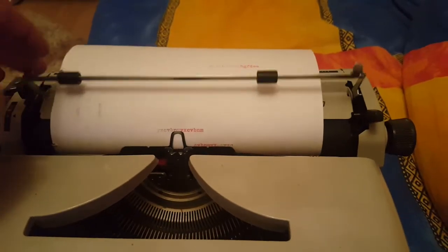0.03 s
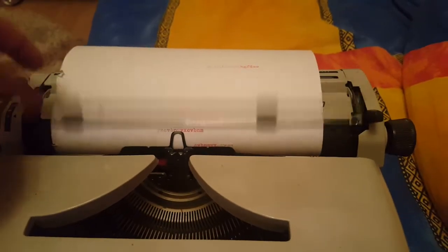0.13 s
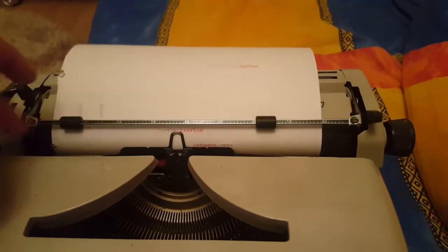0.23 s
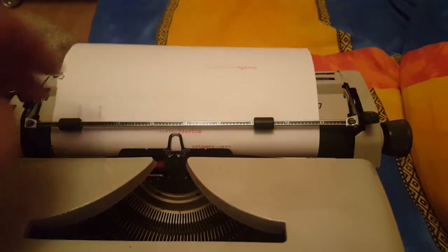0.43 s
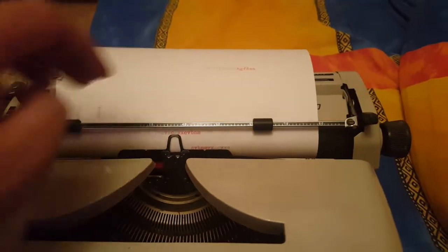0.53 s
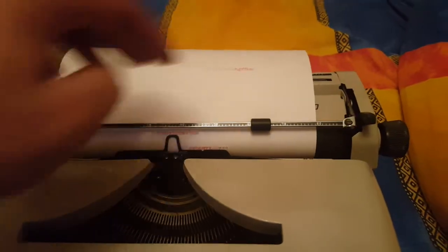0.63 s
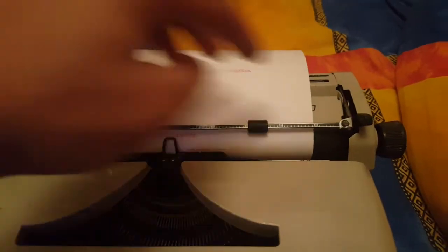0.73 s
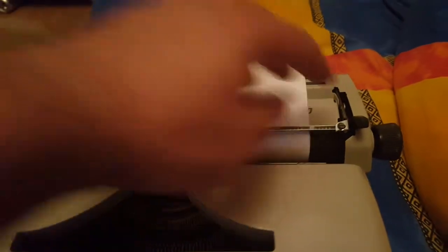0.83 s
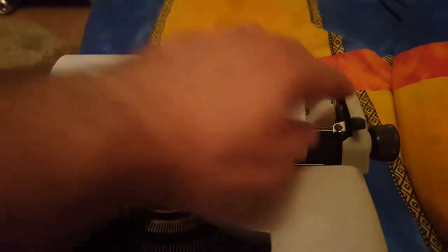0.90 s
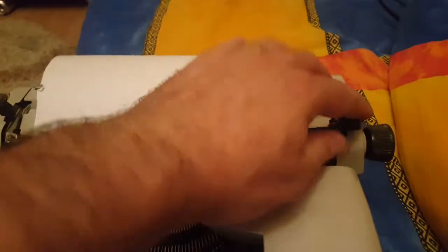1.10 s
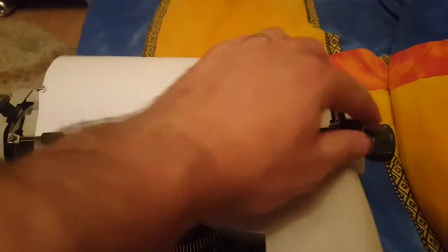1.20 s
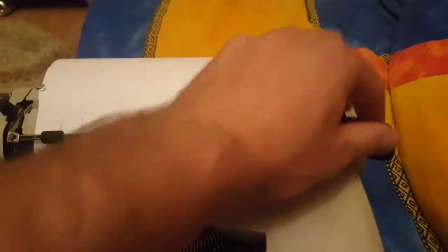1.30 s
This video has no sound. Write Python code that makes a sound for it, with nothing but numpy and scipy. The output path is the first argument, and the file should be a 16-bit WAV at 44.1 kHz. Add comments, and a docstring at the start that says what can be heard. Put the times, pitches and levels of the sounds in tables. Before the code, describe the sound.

Close by in a small room, a typewriter's metal paper bar clacks down, settling with a clink and a short ring. After a pause, the carriage clicks quietly and fingertips tap and brush the knob.

```python
"""A manual typewriter, close by in a small room. A finger touches the lever of the sprung paper bail;
the hinge scrapes as it tips over. At 0.2 s the bail clacks onto the platen, chatters and settles
with a clink, while the frame, a spring and the table ring on. At 1 s a hand takes hold of the platen
knob: the carriage clicks in its play, then fingertips tap and brush the knob.
Faint room noise and mains hum lie under it all."""
import sys
import numpy as np
from scipy import signal
from scipy.fft import rfft, irfft
from scipy.io import wavfile
from scipy.ndimage import uniform_filter1d

SR = 44100
rng = np.random.default_rng(int(sys.argv[2]) if len(sys.argv) > 2 else 0)


def log_audio(samples):
    """Write samples as a 16-bit WAV file to the path given in sys.argv[1]."""
    # one column per channel
    frames = np.atleast_2d(samples).T
    # limit to full scale, then quantise
    limited = np.clip(frames, -1, 1)
    pcm = np.round(limited * 32767).astype(np.int16)
    wavfile.write(sys.argv[1], SR, pcm)


N = 59535
FFT_SIZE = 81920
HZ, T = np.fft.rfftfreq(FFT_SIZE, 1 / SR), np.arange(N) / SR


# Each row: start in seconds, level in dB, crack over clatter in dB, tilt in dB per octave.
BAIL_HITS = [(.1993, -25, -3, -0.5), (.2037, -21, -4.5, 1), (.2053, -18, 6, 3), (.2073, -24, 8, -3.5),
             (.217, -20, 0, -2.5), (.227, -24, 1.5, 1.5), (.235, -24.5, -6, 0)]
# Each row: frequency in Hz, gain in dB.
BAIL_EQ = [(100, -23), (200, -9.5), (340, -20.5), (450, -7.5), (570, 1), (740, 0), (950, -8.5),
           (1350, -1.5), (1660, -4), (1950, 0.5), (2450, -2.5), (3050, -1), (3900, -2), (5300, -6.5),
           (6800, -14), (8100, -17.5), (10100, -27), (13000, -19.5), (15800, -24)]
# Each row: frequency in Hz, level in dB, unscaled T60 in seconds.
FRAME_MODES = [(665, -4, 0.28), (711, -3, 0.082), (800.4, -3.5, 0.1), (1272, 1, .15), (1383, 3, 0.25),
               (1920, 2.5, .18), (2083, -2.5, 0.18), (3000, 2.5, .16), (3160, -2, .16), (3910, -4, .15),
               (3950, 1, 0.32), (4660, -3, .15), (8340, -9, 0.15)]
# Each row: frequency in Hz, clatter T60 in seconds.
BAIL_DECAY = [(600, 0.11), (1300, 0.16), (4000, .125), (8000, 0.13), (13000, 0.13)]

def bail_clack():
    """The bail hits the platen and chatters, ringing the frame."""
    return strikes(BAIL_HITS, BAIL_EQ, FRAME_MODES, BAIL_DECAY, modes_db=-18, t60_scale=0.76,
                   crack_s=0.0021, grit_db=5, grit_t60_s=0.0023, pivot_hz=2500)


# Each row: start in seconds, level in dB, crack over clatter in dB, tilt in dB per octave.
CLINK_HITS = [(.2972, -32, -6, 0), (.3012, -34, -8, 0)]
# Each row: frequency in Hz, gain in dB.
CLINK_EQ = [(300, -3), (1000, -7.5), (2500, -4.5), (4300, 0), (6000, -22), (8200, -8.5), (10000, -25.5),
            (15800, -18)]
# Each row: frequency in Hz, level in dB, unscaled T60 in seconds.
CLINK_RING = [(3970, 6.5, 0.041), (4170, 2.5, 0.026), (4830, 10.5, 0.025), (5000, -13, 0.035),
              (6140, -5, 0.045)]
# Each row: frequency in Hz, clatter T60 in seconds.
CLINK_DECAY = [(1000, 0.049), (4500, 0.018), (13000, 0.024)]

def bail_clink():
    """The bail settles with two small, bright contacts."""
    return strikes(CLINK_HITS, CLINK_EQ, CLINK_RING, CLINK_DECAY, modes_db=-4.5, t60_scale=0.38,
                   crack_s=0.00096, grit_db=17, grit_t60_s=0.0027, pivot_hz=4000)


# Each row: start in seconds, level in dB, crack over clatter in dB, tilt in dB per octave.
HINGE_HITS = [(.169, -56, -10.5, 0.5), (.1737, -48, -3.5, 4), (.182, -36, -6.5, -3.5)]
# Each row: frequency in Hz, gain in dB.
HINGE_EQ = [(300, -36), (800, -20), (1060, 1.5), (1400, -11.5), (1800, -2.5), (3000, -1.5), (4500, -5.5),
            (6500, -16.5), (8000, -18), (10000, -35.5), (15800, -32)]
# Each row: frequency in Hz, level in dB, unscaled T60 in seconds.
HINGE_RING = [(1047, -2.5, 0.73), (1830, -2, .15), (2820, -2, 0.049), (4900, -5, 0.21), (8470, -12.5, 0.27)]

def hinge_scrape():
    """The hinge scrapes in three ticks, each louder, as the bail tips over."""
    return strikes(HINGE_HITS, HINGE_EQ, HINGE_RING, CLICK_DECAY, modes_db=-10.5, t60_scale=0.67,
                   crack_s=0.0004, grit_db=3, grit_t60_s=0.0031, pivot_hz=2500)


# Each row: frequency in Hz, level in dB, rise in seconds, T60 in seconds, left over right in dB.
PANEL_MODES = [(101, -41, .02, .24, 0), (139, -56, .02, 1.4, 1), (176, -35, .015, .15, 1),
               (484, -45, .005, .33, 3), (575, -27, .003, .1, 3), (641, -43, .01, .42, 3),
               (969, -47, .005, .42, 4), (1451, -40, .01, .33, 4)]

def panels(start_s=0.206):
    """The case panels and the table ring on after the clack."""
    return placed(start_s, sum(tone(*mode) for mode in PANEL_MODES))


def spring(start_s=0.31):
    """A spring sings out as the bail comes to rest."""
    return placed(start_s, tone(hz=1593, db=-35.5, rise_s=0.054, t60_s=0.34, pan_db=7.5))


# Each row: start in seconds, level in dB, crack over clatter in dB, tilt in dB per octave.
CARRIAGE_HITS = [(.998, -57, -19, 3), (1.0052, -47, -22, 2), (1.0098, -40.5, 4.5, 1.5),
                 (1.0152, -44, 1, -4), (1.0277, -52, 3.5, -3.5), (1.039, -51, -6, 4), (1.06, -54.5, -10, 2)]
# Each row: frequency in Hz, gain in dB.
CARRIAGE_EQ = [(100, -14.5), (200, -28), (380, -13.5), (550, -13), (760, -6), (900, -15), (1120, -15),
               (1400, -6), (1650, -13), (1930, -5), (2900, -17.5), (3600, -10.5), (4400, -15),
               (7700, -26.5), (9600, -46), (15800, -39)]
# Each row: frequency in Hz, level in dB, unscaled T60 in seconds.
CARRIAGE_MODES = [(653, -5, 0.066), (750, 1, 0.06), (1123, -5.5, 0.06), (1335, -6.5, 0.11),
                  (1350, -11, 0.073), (1915, -11, 0.12), (2096, -3, 0.059), (3420, -14, 0.11)]
# Each row: frequency in Hz, clatter T60 in seconds.
CLICK_DECAY = [(400, 0.024), (1500, 0.08), (4000, 0.037), (8000, 0.045), (13000, 0.042)]

def carriage_clicks():
    """The carriage clicks in its play as a hand grips the knob."""
    return strikes(CARRIAGE_HITS, CARRIAGE_EQ, CARRIAGE_MODES, CLICK_DECAY, modes_db=-4, t60_scale=0.74,
                   crack_s=0.0012, grit_db=2, grit_t60_s=0.032, pivot_hz=2010)


# Each row: start in seconds, level in dB, rise in seconds, T60 in seconds.
TABLE_THUDS = [(.198, -50, .003, .12), (.226, -40, .008, .2), (.28, -52, .008, .15), (1.03, -60, .008, .16)]
# Each row: frequency in Hz, gain in dB.
THUD_EQ = [(20, -21.5), (55, -7), (78, -14.5), (105, -3), (180, -3.5), (260, -4), (400, -21), (900, -60.5)]

def table_thuds():
    """The machine rocks on its padded table."""
    return sum(placed(start_s, amp(db) * fade(t60_s, rise_s) * noise(amp(along(THUD_EQ, HZ)), LIKENESS))
               for start_s, db, rise_s, t60_s in TABLE_THUDS)


# Each row: start in seconds, level in dB, crack over clatter in dB, tilt in dB per octave.
FINGER_HITS = [(1.1225, -49.5, 1.5, 0.5), (1.147, -64, -7, 5), (1.194, -64.5, -9, 0),
               (1.2485, -63.5, -1, -1.5)]
# Each row: frequency in Hz, gain in dB.
FINGER_EQ = [(100, -4.5), (250, -10), (440, -2.5), (580, 1.5), (750, 2), (950, -9), (1200, -0.5),
             (1600, -7), (1930, -0.5), (2900, -10.5), (3900, -6), (5200, -14), (7500, -22), (9500, -36),
             (15800, -36)]

def finger_taps():
    """Fingertips land on the knob and faintly ring the carriage."""
    return strikes(FINGER_HITS, FINGER_EQ, CARRIAGE_MODES, CLICK_DECAY, modes_db=-16, t60_scale=0.57,
                   crack_s=0.0012, grit_db=15, grit_t60_s=0.027, pivot_hz=2000)


# Each row: centre in seconds, Gaussian half width in seconds, level in dB.
FINGER_SLIPS = [(1.122, 0.021, -59.5), (1.201, 0.0066, -65), (1.325, 0.043, -70)]

def finger_brushes(grain_db=3, grain_s=0.0025):
    """Skin slips on the knob in fine grains that sound through the carriage."""
    envelope = sum(amp(db) * np.exp(-((T - centre_s) / half_s) ** 2 / 2)
                   for centre_s, half_s, db in FINGER_SLIPS)
    grains = amp(grain_db * unit(uniform_filter1d(rng.standard_normal(N), int(grain_s * SR))))
    friction = noise(amp(along(FINGER_EQ, HZ)) * sides(along(MACHINE_PAN, HZ)), LIKENESS)
    return envelope * unit(grains * friction)


# Each row: start in seconds, level in dB, crack over clatter in dB, tilt in dB per octave.
LEVER_HITS = [(.082, -68, -8, 0)]
# Each row: frequency in Hz, gain in dB.
LEVER_EQ = [(500, -25), (1500, -12.5), (2050, 1), (2500, -13.5), (3070, -7), (5000, -21.5), (15800, -40.5)]
# Each row: frequency in Hz, level in dB, unscaled T60 in seconds.
LEVER_MODES = [(1940, 2.5, 0.05), (3100, -7.5, .05)]

def lever_touch():
    """A finger meets the bail lever with a faint tick."""
    return strikes(LEVER_HITS, LEVER_EQ, LEVER_MODES, CLINK_DECAY, modes_db=4, t60_scale=0.96,
                   crack_s=0.0012, grit_db=6, grit_t60_s=0.01, pivot_hz=2000)


# Each row: frequency in Hz, left over right in dB.
MACHINE_PAN = [(100, 1), (400, 4), (750, 2), (1300, 5), (1900, 5.5), (2900, -1.5), (4400, -8.5), (6200, 5),
               (8000, 11), (10000, 6), (14000, 3)]
# Each row: frequency in Hz, left-right correlation.
LIKENESS = [(100, 0.65), (500, 0.79), (1100, 0), (2000, .05), (5000, 0.12), (14000, 0.48)]

def strikes(hits, eq, modes, decay, modes_db, t60_scale, crack_s, grit_db, grit_t60_s, pivot_hz):
    """Each contact is a gritty crack, a dense clatter of small parts and a few clear modes."""
    out = np.zeros((2, N))
    body = amp(along(eq, HZ)) * sides(along(MACHINE_PAN, HZ))
    octaves = lambda hz: np.log2(np.maximum(hz / pivot_hz, 0.1))
    for start_s, db, crack_db, tilt_db in hits:
        gain = body * amp(tilt_db * octaves(HZ))
        clatter = dying(noise(gain, LIKENESS), decay)
        grit = unit(fade(grit_t60_s, 0.0001) * noise(1, LIKENESS)) / np.sqrt(N)
        impact = (T == 0) + amp(grit_db) * grit
        # Same energy as crack_s seconds at rms 1.
        crack = unit(filtered(impact, minimum_phase(gain))) * np.sqrt(crack_s * SR / N)
        ring = np.zeros((2, N))
        for hz, mode_db, t60_s in modes:
            phase, side, scatter_db = rng.standard_normal(3)
            phase_split = np.sign(side) * stereo_angle(LIKENESS, hz) * np.array([[1], [-1]])
            level = amp(mode_db + scatter_db + tilt_db * octaves(hz)) * sides(along(MACHINE_PAN, hz))
            wave = np.sin(2 * np.pi * (hz * T + phase) + phase_split)
            ring += level * fade(t60_s * t60_scale, 0.0004) * wave
        out += placed(start_s, amp(db) * (clatter + amp(crack_db) * crack + amp(modes_db) * ring))
    return out


# Each row: frequency in Hz, gain in dB.
ROOM_EQ = [(150, -1.5), (350, -0.5), (650, -3.5), (1100, -1.5), (2500, -2.5), (4200, -3.5), (7000, -1),
           (13000, 0)]
# Each row: frequency in Hz, T60 in seconds.
ROOM_DECAY = [(150, .45), (600, 0.35), (2000, 0.31), (4000, 0.24), (7800, 0.27), (13000, 0.13)]

def room(x, wet_db=-11, delay_s=0.008):
    """The short tail of a furnished room."""
    tail = placed(delay_s, dying(noise(amp(along(ROOM_EQ, HZ)), LIKENESS), ROOM_DECAY))
    return amp(wet_db) * filtered(x, rfft(tail / np.linalg.norm(tail[0]), FFT_SIZE))


# Each row: frequency in Hz, gain in dB.
AIR_EQ = [(20, -6.5), (45, -12.5), (75, -7), (110, -1), (160, -7), (300, -10), (500, -13), (700, -17.5),
          (1500, -19.5), (2500, -22.5), (5600, -30), (10000, -33.5), (15500, -28.5)]
# Each row: frequency in Hz, left-right correlation.
AIR_LIKENESS = [(100, .9), (600, 0.23), (3000, 0.18), (12000, 0.045)]

def air(noise_db=-68, hum_hz=100.74, hum_db=-74):
    """Quiet room noise with a faint mains hum."""
    hum = amp(hum_db) * np.sin(2 * np.pi * hum_hz * T)
    return amp(noise_db) * noise(amp(along(AIR_EQ, HZ)), AIR_LIKENESS) + hum


def amp(db):
    """Decibels to gain."""
    return 10 ** (np.asarray(db) / 20)


def unit(x):
    """x at rms 1."""
    return x / np.sqrt(np.mean(x ** 2) + 1e-20)


def along(points, hz):
    """(Hz, value) points read on a log frequency axis."""
    points_hz, values = np.transpose(points)
    return np.interp(np.log(hz + 1), np.log(points_hz + 1), values)


def sides(db):
    """Left and right gains for a level difference."""
    return amp(np.array([np.atleast_1d(db), -np.atleast_1d(db)]) / 2)


def stereo_angle(likeness, hz):
    """Mid-side angle in radians for a left-right correlation curve."""
    return np.arccos(np.clip(along(likeness, hz), -1, 1)) / 2


def filtered(x, gain):
    """x through a frequency response."""
    return irfft(rfft(x, FFT_SIZE) * gain, FFT_SIZE)[..., :N]


def minimum_phase(gain):
    """The causal response with this gain."""
    cepstrum = irfft(np.log(np.maximum(gain, 1e-6)))
    cepstrum[..., 1:FFT_SIZE // 2] *= 2
    cepstrum[..., FFT_SIZE // 2 + 1:] = 0
    return np.exp(rfft(cepstrum))


def placed(start_s, x):
    """Stereo x delayed to start_s, cut to N samples."""
    return np.pad(x, ((0, 0), (round(start_s * SR), 0)))[:, :N]


def noise(gain, likeness):
    """Coloured stereo noise of rms 1."""
    angle = stereo_angle(likeness, HZ)
    mid, side = rfft(rng.standard_normal((2, FFT_SIZE))) * np.array([np.cos(angle), np.sin(angle)])
    return unit(irfft(gain * np.array([mid + side, mid - side]))[:, :N])


def fade(t60_s, rise_s):
    """A quick rise and an exponential decay."""
    return np.exp(-np.log(1000) * T / t60_s) * (1 - np.exp(-T / rise_s))


def tone(hz, db, rise_s, t60_s, pan_db):
    """One panned, decaying sine."""
    return amp(db) * sides(pan_db) * fade(t60_s, rise_s) * np.sin(2 * np.pi * hz * T)


def dying(x, decay):
    """Each frequency of x dies at its own speed."""
    hz, t, spectrum = signal.stft(x, SR, nperseg=256)
    envelope = np.exp(-np.log(1000) * t / along(decay, hz)[:, None])
    return signal.istft(spectrum * envelope, SR)[1][:, :N]


def scene():
    """Knob and bail with the room's tail, plus after-ring, thuds and air."""
    knob = carriage_clicks() + finger_taps()
    bail = lever_touch() + hinge_scrape() + bail_clack() + bail_clink()
    machine = bail + knob + finger_brushes()
    return machine + room(machine) + panels() + spring() + table_thuds() + air()


def record(dry, ceiling=0.9, top_hz=15850):
    """A soft limiter rounds off the clack's peak, and the highest treble is cut."""
    rounded = dry / (1 + (dry / ceiling) ** 4) ** (1 / 4)
    return filtered(rounded, 1 / np.sqrt(1 + (HZ / top_hz) ** 200))


dry = scene()
out = record(dry)
log_audio(out)
```